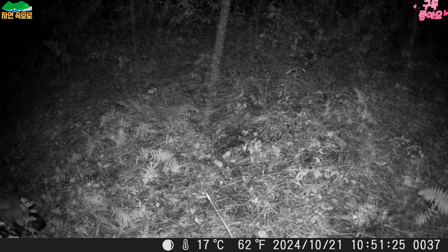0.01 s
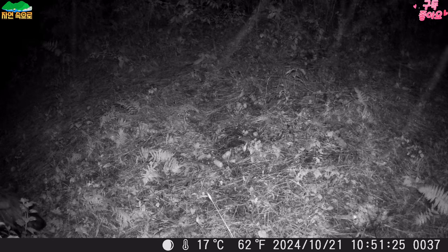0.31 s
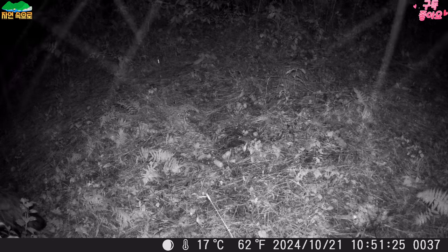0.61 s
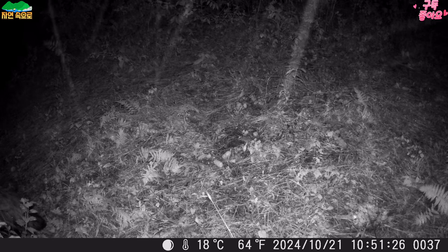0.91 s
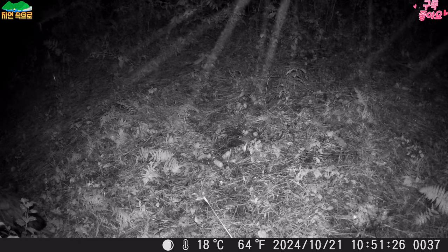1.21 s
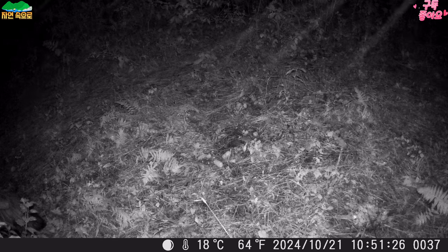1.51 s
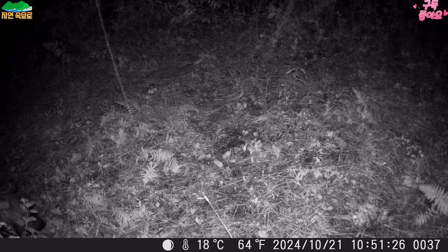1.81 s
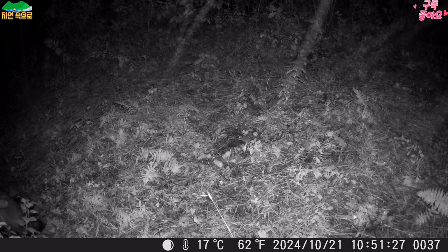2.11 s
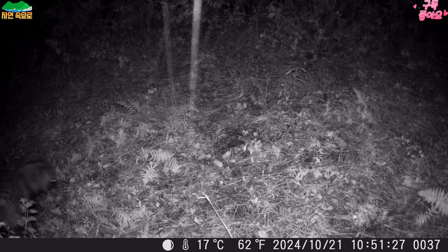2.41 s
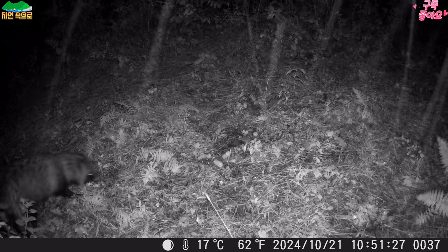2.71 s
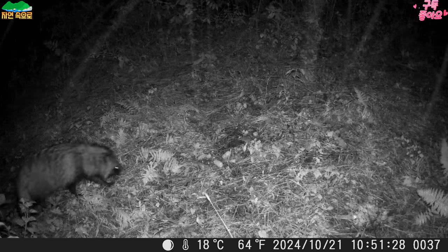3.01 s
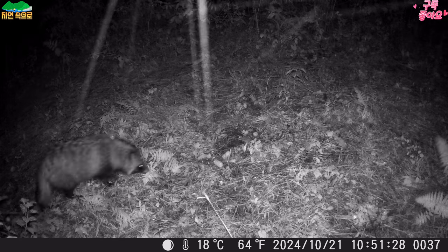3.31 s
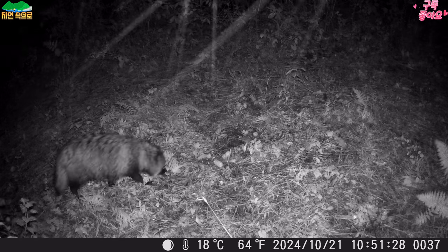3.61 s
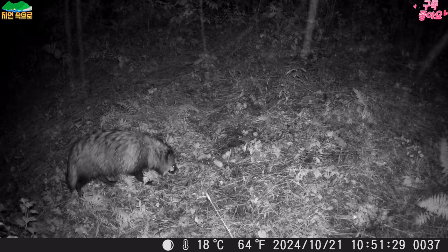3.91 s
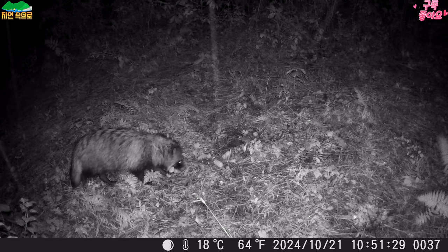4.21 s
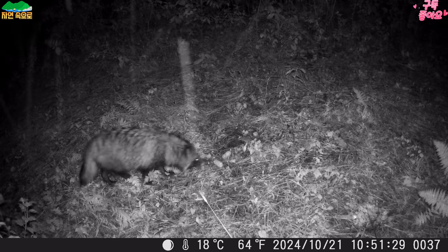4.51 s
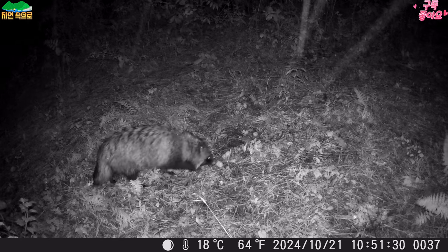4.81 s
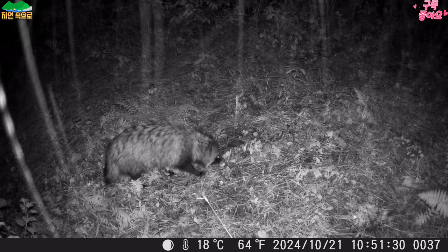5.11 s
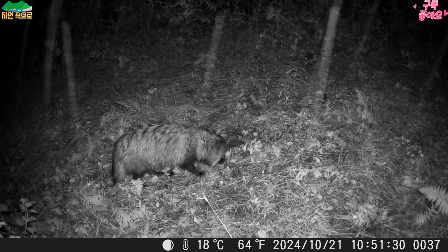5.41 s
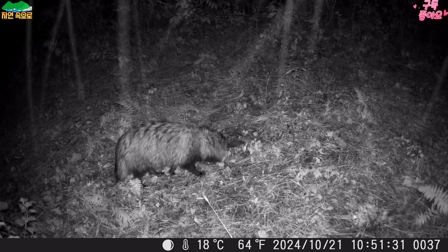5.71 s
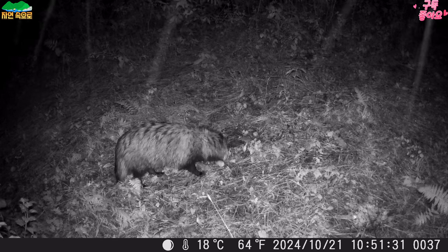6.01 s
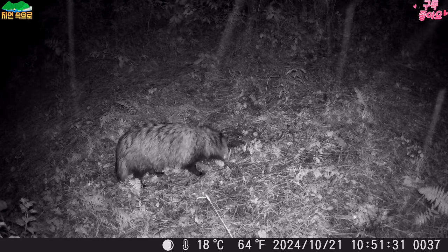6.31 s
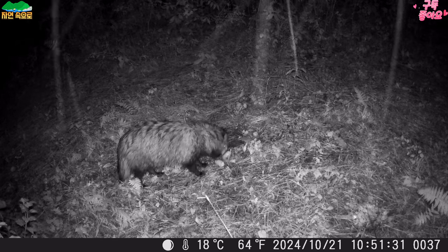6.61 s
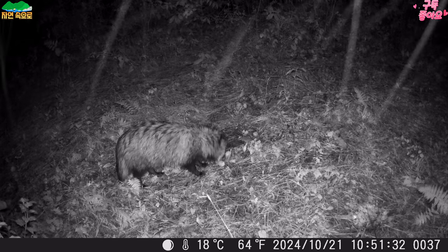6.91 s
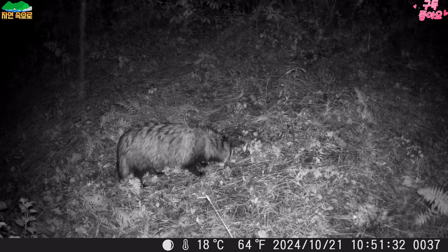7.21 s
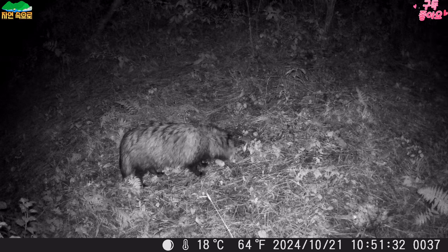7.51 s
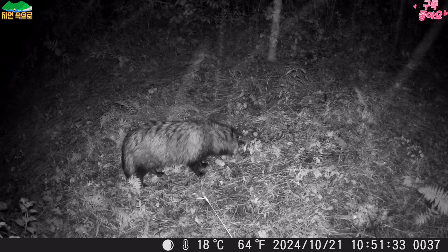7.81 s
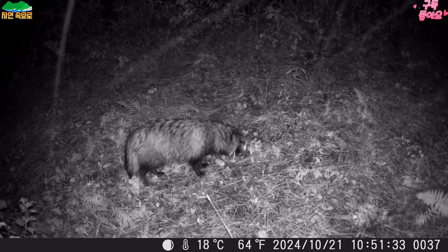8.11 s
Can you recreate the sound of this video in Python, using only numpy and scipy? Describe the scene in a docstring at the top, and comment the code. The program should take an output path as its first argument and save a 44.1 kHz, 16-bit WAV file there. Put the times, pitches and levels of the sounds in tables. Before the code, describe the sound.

Light rain falls in a wood at night, heard in mono from inside a trail camera's plastic case. Throughout, single drops knock on the case at uneven intervals, each short and hollow, slightly different in pitch, and followed by a brief low shudder of the mount. Duller, softer pats land close by on the mount and on leaf litter, where a foraging animal treads softly.

A sharp tap comes at 0.6 seconds, then a sparse stretch until a few knocks just after 2. A strong, duller knock lands at 3 seconds, with more taps at 3.7, 4.1 and 4.5. A small cluster with a tiny ping near 5.5 leads to by far the loudest knock at 5.75. Lighter taps come thickly from 7 seconds to the end at about 8.4, strongest near 7.7. Faint far drizzle, a low uneven rumble of air and steady microphone hiss lie underneath.

```python
"""A wood at night in light rain, the microphone inside the plastic case of a trail camera.
Drops knock right on the case and ring its short modes; duller pats land close by, on the mount and on
the leaf litter where a foraging animal treads softly. Knocks and pats leave the mount shuddering.
Under them lie faint far drizzle, a low rumble of moving air and the microphone's hiss."""
import sys
import numpy as np
from scipy import signal
from scipy.fft import rfft, irfft
from scipy.io import wavfile
from scipy.ndimage import uniform_filter1d

SR = 44100
rng = np.random.default_rng(int(sys.argv[2]) if len(sys.argv) > 2 else 0)


def inscribe(sig):
    """Save sig as 16-bit PCM at rate SR to the path in sys.argv[1].

    A 1-D sig is mono; a 2-D sig holds one channel per row.
    Samples are clipped to [-1, 1] before scaling.
    """
    pcm = np.round(np.clip(np.atleast_2d(sig).T, -1, 1) * 32767)
    wavfile.write(sys.argv[1], SR, pcm.astype(np.int16))


N = 370440
SIZE = 8192  # samples in one blow
PING_HZ = 1227  # the note of the case that rings on

# drops on the case: t/s, strength/dB, hardness/(dB per octave), extra tick/dB, note/Hz, its lift/dB
KNOCKS = [(0.092, -17.5, 0.5, -6, 1660, 9), (0.399, -10.5, 2, 3, 1590, 9.5), (0.615, -1, 7, 7, 1920, 17),
          (2.1686, -7.5, 1.5, 2, 1410, 7), (2.2767, -6.5, -2, 3, 600, -1), (2.295, -10.5, 0, 1, 790, 8),
          (2.4902, -26.5, 5, 2, 1950, 20), (2.9641, 12, -4.5, -7, 1540, 5), (3.3263, -2.5, -2, -4, 1570, 7),
          (3.7309, 1.5, -5.5, 18, 1265, 7), (4.128, 3.5, 0, 2.5, 1420, 5.5), (4.4599, -14, 0, 8, 3340, 7),
          (4.49, -7, -1.5, -4, 670, 14.5), (4.5175, -0.5, 4, 10, 1320, 7),
          (4.9107, -7, -6.5, -13, 1860, 10), (5.321, -12.5, -2.5, -5, 1010, 11.5),
          (5.412, -3, -2, 3, 590, 10), (5.4452, -4.5, 3, 3, 1320, 5), (5.7501, 21, 0, 6, 1350, 3.5),
          (5.9912, 1, -2, -3, 654, 11.5), (6.222, -5.5, -4.5, 3, 570, 5.5), (6.5981, -9, -1.5, -11, 473, 8),
          (6.6613, -3.5, 2.5, 7, 1356, 6.5), (7.104, -6.5, 0, -13, 1390, 6), (7.1488, -8, -3, 4, 315, 12.5),
          (7.2101, -4.5, 1, -4, 1020, 8.5), (7.5063, -8, 2, 10, 640, 12.5),
          (7.6679, 6, -2.5, -2.5, 1384, 10), (7.7124, -3, 0, 2.5, 1290, 4.5),
          (7.8525, -13, -2, -11, 1270, 6), (7.8647, -12, 4.5, 11, 1330, 8.5),
          (7.9489, -7, 0.5, -4, 1350, 11), (8.0074, -1.5, -2, -10, 1320, 10), (8.087, -12.5, -1, 4, 740, 2),
          (8.1997, -10.5, -3.5, -8, 990, 11), (8.3827, -13.5, -3.5, -6, 480, 8)]
# soft pats close by: t/s, length/s, strength/dB, hardness/(dB per octave), note/Hz, its lift/dB
PATS = [(0.027, 0.027, -12, -6.5, 312, 14), (0.329, 0.0039, -20, 7, 1480, 13),
        (0.355, 0.016, -17.5, -8.5, 1020, 4), (0.612, 0.003, -8, -5, 850, 14),
        (0.615, 0.0061, 9, -5.5, 940, 9), (0.623, 0.015, -9, -8, 555, 12),
        (0.838, 0.021, -18, -11.5, 302, 15), (1.499, 0.013, -12, 0.5, 370, 13),
        (1.543, .004, -19, -2, 1300, 11), (1.737, 0.006, -14, -1, 460, 5),
        (1.845, 0.031, -18, -7, 497, 4.5), (2.126, 0.016, -14, -1, 455, 10.5),
        (2.392, 0.015, -14, -0.5, 308, 10), (2.567, .023, -17.5, -5, 1250, 7),
        (2.64, 0.0041, -18, -2, 640, 7), (2.666, 0.006, -20.5, -10.5, 630, 11.5),
        (2.899, 0.022, -14, -1.5, 416, 6.5), (3.017, .0021, -15.5, 2, 1250, 9),
        (3.181, 0.0028, -15, -9.5, 503, 9), (3.191, 0.04, -10.5, -4.5, 368, 18),
        (3.24, .0042, -14, 3.5, 1200, 8), (3.462, 0.019, -21.5, -11, 455, 10.5),
        (3.525, 0.029, -10, -4, 740, 10), (4.257, 0.017, -12, -5.5, 647, 7.5),
        (4.63, 0.008, -9.5, -3, 1280, 8.5), (4.737, 0.014, -10, 3, 715, 13),
        (4.856, 0.024, -13, -1.5, 470, 9), (5.261, 0.01, -10, 3.5, 474, 13.5),
        (5.491, 0.022, -5.5, -6, 720, 9), (5.569, 0.0059, -6, -5, 480, 1.5),
        (5.717, 0.0099, -16.5, -5, 280, 5), (5.932, 0.025, -12, -2, 500, 6),
        (6.17, 0.027, -12.5, -3.5, 1250, 9), (6.774, 0.0025, -12.5, -0.5, 950, 10.5),
        (7.058, 0.013, -5, -0.5, 483, 11), (7.132, 0.0057, -14, -7, 1250, 6),
        (7.18, 0.0039, -13, -3, 1020, 5), (7.509, 0.0094, -5.5, 3, 1310, -4),
        (7.556, 0.0045, -10.5, -0.5, 930, 18), (7.564, 0.016, -13.5, -6.5, 640, 9),
        (7.798, 0.0024, -18, -1, 1270, 15.5), (7.978, .0037, -4.5, -3, 1120, 12.5),
        (8.002, 0.0028, -9, -2, 1310, 6), (8.026, 0.012, -17, -2, 760, 9),
        (8.188, 0.0053, -10.5, 1, 1010, 12), (8.291, .016, -4.5, 0, 1290, 3)]
# colour of an average pat, from the low band to the tick: level/dB
PAT_COLOUR = [2.5, 0, -9, -48.5, -37.5]


def undb(db):
    """Decibels to gain."""
    return 10 ** (np.asarray(db) / 20)


def level(x, db):
    """Scale to an rms level."""
    return x * undb(db) / np.sqrt(np.mean(x ** 2))


def add(out, t, sound):
    """Mix a sound in at t seconds."""
    i = max(int(t * SR), 0)
    part = sound[:max(N - i, 0)]
    out[i:i + len(part)] += part


def freqs(size):
    """Frequency of each bin of a real spectrum, kept above zero."""
    return np.maximum(np.arange(size // 2 + 1) * SR / size, 1)


def walk(rate_hz):
    """Random levels, each held 1 / rate_hz seconds, smoothed twice; rms 1."""
    hold = int(SR / rate_hz)
    steps = np.repeat(rng.standard_normal(1000)[:N // hold + 1], hold)
    return level(uniform_filter1d(uniform_filter1d(steps, hold), hold)[:N], 0)


def noise(points):
    """Noise of rms 1 whose spectrum follows points of f/Hz, level/dB."""
    hz, db = np.transpose(points)
    gain = undb(np.interp(np.log(freqs(N)), np.log(hz), db))
    return level(irfft(rfft(rng.standard_normal(N)) * gain, N), 0)


def case_response(size, travel_s=0.00078):
    """The case's modes start nearly in step and beat a few ms later; bending waves bring treble first."""
    # resonances of the plastic around the microphone: f/Hz, width/Hz, level/dB
    resonances = [(104, 69, -4), (197.3, 41, -6.5), (333, 55, -6.5), (454.5, 46, -1.5), (559.7, 85, -5.5),
                  (659, 56, -5.5), (807, 77, -11.5), (908, 70, -12), (1069, 115, -4.5), (1230, 99, -2),
                  (1423, 65, -6.5), (1644, 85, -11.5), (1900, 250, -10.5), (2232, 134, -6),
                  (2540, 180, -13), (2693, 130, -4.5), (3103, 200, -6.5), (3527, 180, -3), (4160, 860, -12),
                  (4340, 1400, -12.5), (5870, 190, -10.5), (6550, 120, -14), (6730, 160, -10.5),
                  (7050, 260, -19.5)]
    f = freqs(size)
    modes = sum(undb(db) / (1 + 1j * (f / hz - hz / f) * hz / width) for hz, width, db in resonances)
    return modes * np.exp(-4j * np.pi * travel_s * np.sqrt(f * PING_HZ))


def blow(colour, strength_db, hardness, note_hz, lift_db, tick_db=0, note_width=0.13):
    """Spectrum of one contact: a harder one tilts to the treble, a sharp one adds a tick above it."""
    # centres of the low, middle, bright, upper and tick bands: f/Hz
    band_hz = [550, 1250, 2400, 4500, 6000]
    octaves = np.log2(np.array(band_hz) / band_hz[1])
    band_db = strength_db + np.array(colour) + hardness * octaves
    band_db[-1] = strength_db + colour[-1] + tick_db
    pitch = np.log(freqs(SIZE))
    db = np.interp(pitch, np.log(band_hz), band_db)
    # small drops hardly move the lowest modes: the bass falls 2 dB per octave
    db += 2 * np.minimum(np.log2(freqs(SIZE) / band_hz[0]), 0)
    # the landing place lifts one note of the case
    db += lift_db * np.exp(-((pitch - np.log(note_hz)) / note_width) ** 2)
    # minimum phase, so nothing sounds ahead of the contact
    cepstrum = irfft(np.log(undb(db)))
    cepstrum[1:SIZE // 2] *= 2
    cepstrum[SIZE // 2 + 1:] = 0
    return np.exp(rfft(cepstrum))


def strike(response, force):
    """Ring a response with a force; the shape of the force leaves the energy unchanged."""
    sound = response * rfft(force)
    return irfft(sound * np.linalg.norm(response) / np.linalg.norm(sound))


def drizzle(per_second=200, scatter_db=3, dull_hz=800, splash_s=0.0046, level_db=-68):
    """Countless far drops splash on the leaves, dulled by distance and coloured by the case."""
    falls = rng.random(N) < per_second / SR
    sizes = falls * undb(scatter_db * np.minimum(rng.exponential(size=N), 4))
    power = signal.lfilter([1], [1, -np.exp(-1 / (splash_s * SR))], sizes ** 2)
    splashes = np.sqrt(power) * rng.standard_normal(N)
    distance_loss = (1 + 1j * freqs(N) / dull_hz) ** 2
    return level(irfft(rfft(splashes) * case_response(N) / distance_loss, N), level_db)


def rumble(trim_db=-1.5, gust_db=3.0):
    """Air moves past the camera in small uneven gusts."""
    # slow rise and fall of the air: t/s, level/dB before trim and gusts
    swells = [(0.0, -59), (0.4, -66), (0.75, -60.5), (1.59, -63), (3.95, -58), (6.46, -62.5), (8.4, -61.5)]
    # spectrum of the rumble: f/Hz, relative level/dB
    colour = [(8, -17), (20, 3), (50, -4), (105, -5), (140, -17), (260, -28), (600, -73.5)]
    times, db = np.transpose(swells)
    swell_db = np.interp(np.arange(N) / SR, times, db)
    return noise(colour) * undb(swell_db + trim_db + gust_db * walk(rate_hz=14))


def hiss(level_db=-67):
    """The microphone's own steady noise."""
    # spectrum of the noise floor: f/Hz, relative level/dB
    colour = [(60, -24), (150, 4.5), (300, -3.5), (900, -8), (1600, -11), (2300, -13), (3300, -22.5),
              (4200, -29), (5200, -34), (6400, -25.5), (7700, -22), (8200, -34.5)]
    return noise(colour) * undb(level_db)


def pats(case, swell=0.36, fade=0.53):
    """A soft landing close by is a swelling and fading crowd of tiny contacts with hardly any tick."""
    out, t = np.zeros(N), np.arange(SIZE) / SR
    for start, length, *contact in PATS:
        force = rng.standard_normal(SIZE) * (t / length) ** swell * np.exp(-t / (fade * length))
        add(out, start, strike(case * blow(PAT_COLOUR, *contact), force))
    return out


def mount(rise_s=0.0055, decay_s=0.033, knock_db=-61.5, pat_db=-63, softness=1.8):
    """Knocks and pats leave the mount shuddering, low and woody; strong, soft ones shake it most."""
    # spectrum of the shudder: f/Hz, relative level/dB
    colour = [(12, -11), (35, 3), (70, 1), (130, -15), (220, -9), (330, -8), (450, -12), (650, -16.5),
              (1000, -28.5), (2000, -58)]
    envelope, t = np.zeros(N), np.arange(2 * SIZE) / SR
    shudder = (1 - np.exp(-t / rise_s)) * np.exp(-t / decay_s)
    for start, db, hardness, *_ in KNOCKS:
        add(envelope, start, undb(db - softness * hardness + knock_db) * shudder)
    for start, _, db, hardness, *_ in PATS:
        add(envelope, start, undb(db - softness * hardness + pat_db) * shudder)
    return envelope * noise(colour)


def knocks(case, spray_db=-10, spray_s=0.004, fine_hz=3000):
    """Right at the microphone a drop strikes the case once, then its spray skitters over the plastic."""
    # colour of an average knock, from the low band to the tick: level/dB
    colour = [-4.5, 2, -4.5, -36, -32]
    out, t = np.zeros(N), np.arange(SIZE) / SR
    fine = 1 + 1j * freqs(SIZE) / fine_hz  # fine spray roughens the treble
    mean_spectrum = np.hypot(1, undb(spray_db) * np.abs(fine))
    for start, db, hardness, tick_db, note_hz, lift_db in KNOCKS:
        spray = rng.standard_normal(SIZE) * np.exp(-t / spray_s)
        spray *= undb(spray_db) / np.linalg.norm(spray)
        force = irfft((1 + rfft(spray) * fine) / mean_spectrum)  # impulse plus spray, flat on average
        contact = blow(colour, db, hardness, note_hz, lift_db, tick_db)
        add(out, start, strike(case * contact, force))
    return out


def drips(case, count=130, mean_db=-23, scatter_db=3, splash_s=0.0016, low_hz=550, high_hz=1450):
    """Faint stray pats fall at random around the camera, each with a note of its own."""
    out, t = np.zeros(N), np.arange(SIZE) / SR
    for when, size, place in rng.random((count, 3)):
        note_hz = low_hz + place * (high_hz - low_hz)
        strength_db = mean_db + scatter_db * (2 * size - 1)
        contact = blow(PAT_COLOUR, strength_db, hardness=2.0, note_hz=note_hz, lift_db=10)
        force = rng.standard_normal(SIZE) * t * np.exp(-t / splash_s)
        add(out, when * N / SR, strike(case * contact, force))
    return out


def pings(rise_s=0.0012, decay_s=0.016):
    """One lightly damped note of the case outlasts the splash."""
    # drops that leave the case singing: t/s, level/dB
    singing_drops = [(2.57, -47), (5.493, -35.5), (5.565, -45)]
    out, t = np.zeros(N), np.arange(SIZE) / SR
    note = np.sin(2 * np.pi * PING_HZ * t) * np.exp(-t / decay_s) * (1 - np.exp(-t / rise_s))
    for start, db in singing_drops:
        add(out, start, undb(db) * note)
    return out


def scene():
    """In mono: close drops and the shudder of the mount over hiss, far drizzle and rumble."""
    case = case_response(SIZE)
    near = knocks(case) + pats(case) + pings() + mount() + drips(case)
    return (near + hiss() + drizzle() + rumble())[None]


def record(dry, top_hz=8050):
    """The camera keeps only the band below about 8 kHz."""
    return signal.sosfilt(signal.ellip(10, .2, 70, top_hz, fs=SR, output="sos"), dry)


dry = scene()
out = record(dry)
inscribe(out)
```